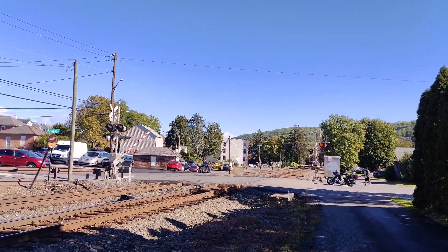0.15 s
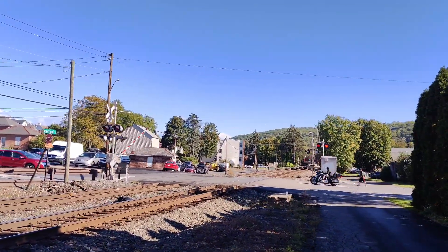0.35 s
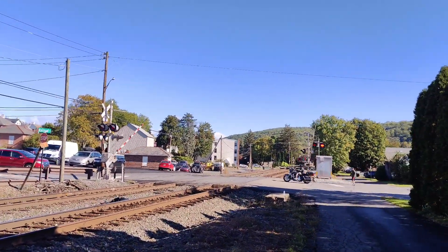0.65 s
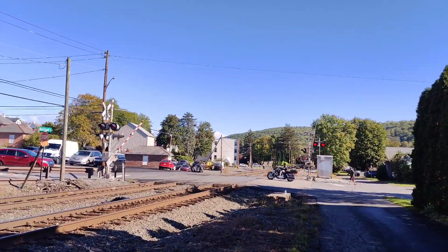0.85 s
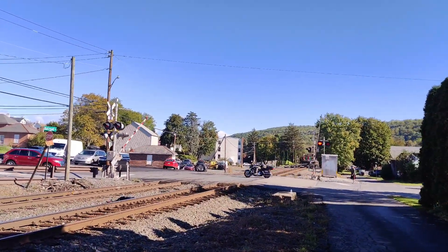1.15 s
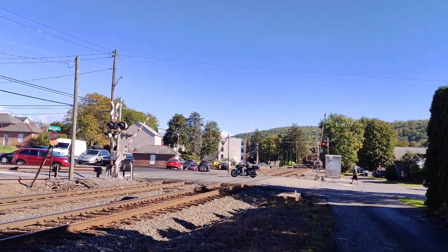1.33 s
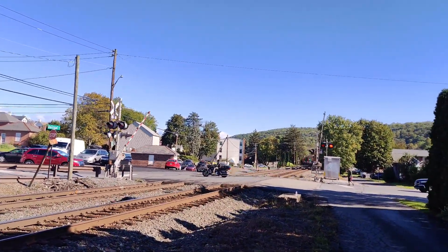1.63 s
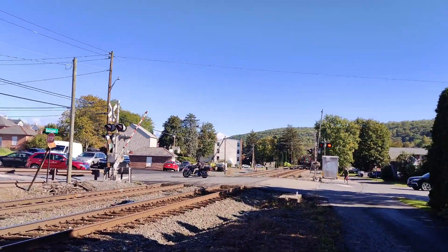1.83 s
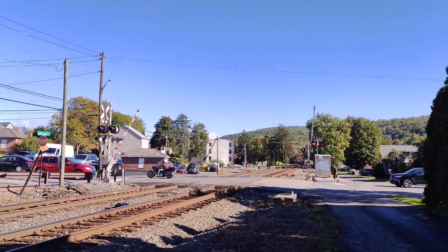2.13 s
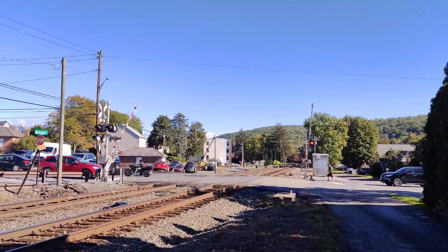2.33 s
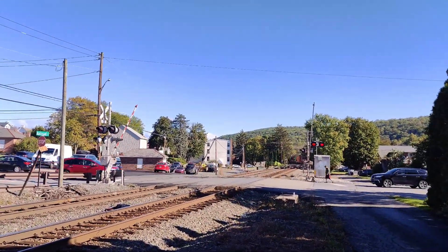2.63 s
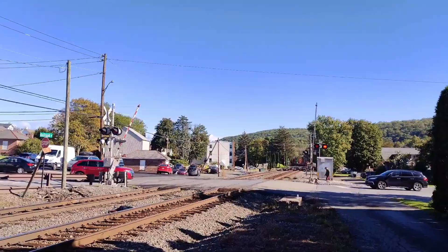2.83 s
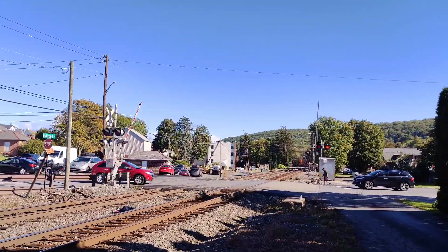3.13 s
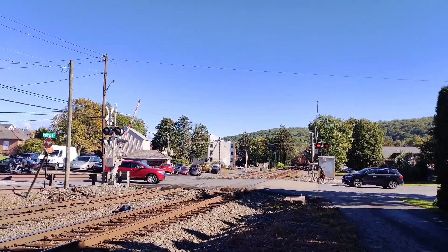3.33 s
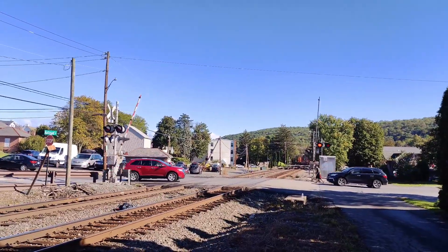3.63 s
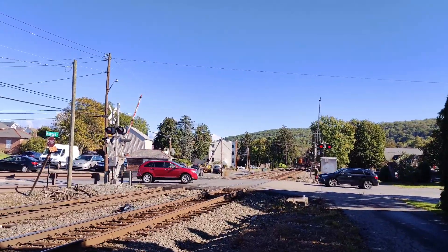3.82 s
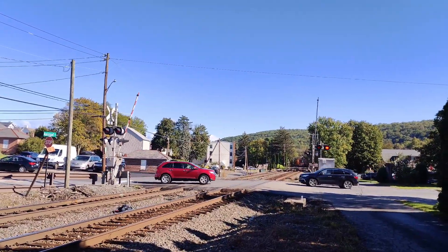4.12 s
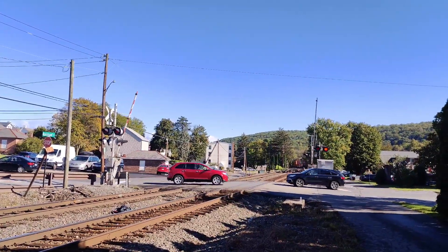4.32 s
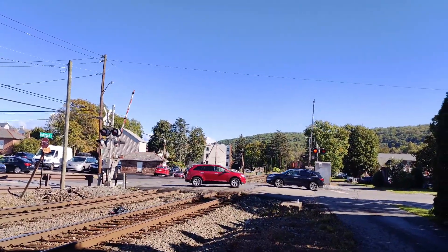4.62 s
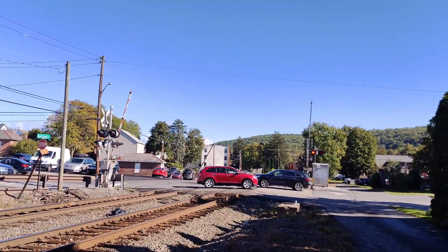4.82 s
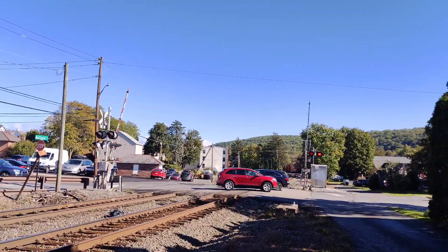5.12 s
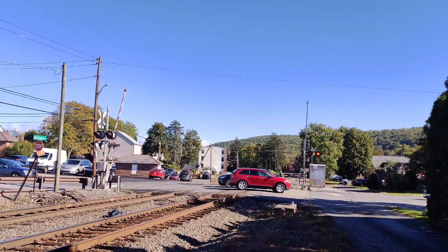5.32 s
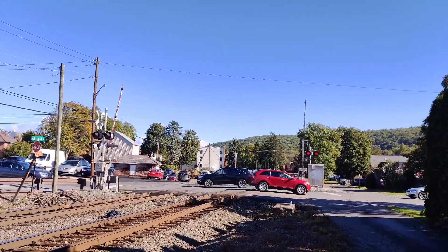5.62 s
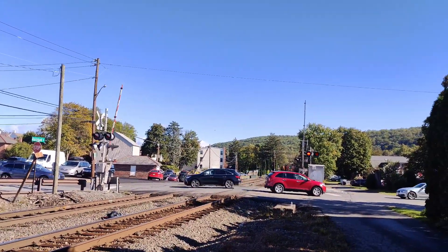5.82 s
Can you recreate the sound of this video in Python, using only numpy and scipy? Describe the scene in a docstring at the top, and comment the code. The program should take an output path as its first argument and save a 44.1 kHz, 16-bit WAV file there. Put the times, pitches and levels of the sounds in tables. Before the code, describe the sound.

Outdoor stereo on a small handheld microphone beside a level crossing. From the start a big V-twin motorcycle is already pulling, with low, uneven exhaust puffs, coarse gas rasp and a slight metallic ring, while wind flutters and thumps hard on the left until about 0.4 s. Engine speed rises until about 1.3 s; around 1.45 s the throttle closes, the rasp collapses and the pitch drops for a gear change. One tiny dry tick comes close by at 1.7 s. From about 2.1 s the exhaust bites again, crackly at first, climbing to a full growl at 3.4-4.0 s, with another left-side gust. The bike drifts from right to left. After 4.1 s it eases, with a brief narrow swish around 4.15-4.5 s, then fades to a dull, distant throb by 6 s. Wind buffets return from 4.7 to 5.4 s. Faint street echoes and a low far-traffic hum lie beneath.

```python
"""V-twin motorcycle riding off

A big V-twin accelerates over a level crossing from right to left, changes gear and rides away.
Its two cylinders fire unevenly: each firing gives low exhaust puffs, a burst of rasp noise and a metallic ring.
A sine throbs with the crank, and a narrow swish of noise joins in later. Far traffic is a steady noise hum.
Wind noise and short buffets hit the two microphone ports, mostly the left; a dry tick rings close by."""
import sys
import numpy as np
from scipy import signal
from scipy.fft import rfft, irfft
from scipy.io import wavfile
from scipy.ndimage import uniform_filter1d, map_coordinates

SR = 44100
rng = np.random.default_rng(int(sys.argv[2]) if len(sys.argv) > 2 else 0)


def pcm_store(signal):
    """Save signal as 16-bit PCM."""
    levels = np.round(np.clip(np.atleast_2d(signal), -1, 1) * 32767)
    wavfile.write(sys.argv[1], SR, levels.astype(np.int16).T)


def boost(x):
    """Linear amplitude factor 10**(x/20) for a level x in decibels (scalar or array-like)."""
    u = np.asarray(x, float) / 20
    return 10 ** u


N = 262836

# engine speed: time_s, speed_rpm
ENGINE_SPEED = [(0.0, 1642), (0.3, 1642), (0.55, 1715), (0.76, 1924), (1.25, 2356), (1.45, 2338),
                (1.7, 1760), (2.2, 1731), (2.53, 1857), (3.33, 2310), (4.27, 2783), (4.5, 2785),
                (4.85, 2745), (5.12, 2640), (5.4, 2625), (5.65, 2500), (5.96, 2456)]
# low tone at one cycle per crank turn: time_s, level_db
THROB_LEVEL = [(0, -33), (1.5, -27), (3.4, -37), (3.8, -14.5), (4.12, -39.5), (4.35, -22.5), (4.6, -37),
               (5.5, -30), (5.96, -32)]
# gas rasp at the pipe ends: time_s, low_db, middle_db, high_db, share gated by the firings (0-1)
RASP_LEVELS = [(0.0, -28, -30, -29, 0.7), (0.45, -27, -25, -31, 0.41), (0.75, -27, -24, -27.5, 0.75),
               (0.94, -28, -25, -29, 0.59), (1.2, -28, -24, -30, 0.52), (1.44, -39, -35, -39, 0.15),
               (1.95, -38.5, -37.5, -39.5, 0.08), (2.07, -38, -33.5, -37, 0.2),
               (2.12, -35, -30.5, -31, 0.74), (2.2, -35.5, -30.5, -33.5, 0.8),
               (2.3, -34.5, -32.5, -37, 0.46), (2.45, -33, -27.5, -27, 0.92), (2.54, -30, -25.5, -30, 0.85),
               (2.64, -31, -25.5, -30, 0.74), (2.84, -31.5, -26, -29.5, 0.93),
               (2.95, -32, -32.5, -36, 0.26), (3.15, -32, -31.5, -37, 0.3),
               (3.36, -26.5, -23.5, -26.5, 0.59), (3.6, -26.5, -24, -29, 0.63),
               (3.75, -23.5, -22, -26, 0.56), (3.97, -21.5, -22.5, -27.5, 0.44),
               (4.1, -29, -30, -33.5, 0.4), (4.33, -30.5, -30.5, -36, 0.1), (4.46, -27.5, -27, -31, 0.36),
               (4.6, -32.5, -32.5, -38.5, 0.1), (5.25, -49.5, -46.5, -52, 0.45),
               (5.96, -47, -61, -75, 0.97)]
# top rasp band, above 7.5 kHz, against the high one: time_s, level_db
SIZZLE_LEVEL = [(0, -9.5), (.75, -8.5), (1.4, -12.5), (2.0, -14), (2.45, -10.5), (3.1, -11.5), (3.6, -11.5),
                (4.0, -10), (4.6, -13), (5.96, -10.5)]
# spectrum of the rasp noise: frequency_hz, level_db (per Hz)
RASP_SPECTRUM = [(210, -33.5), (350, 4), (484, -17.5), (620, 3), (831, 1.5), (1180, 7), (1470, -6),
                 (1770, -5), (2000, -8), (2370, -8), (3180, -4.5), (3700, -13.5), (5990, -18.5),
                 (7000, -20), (8160, -14.5), (10400, -34.5), (14000, -61)]
# shape of a rasp burst, one row per band: swell_s, lead_s (how far ahead of the firing it starts)
RASP_BURST = [(.0013, .0052), (.0014, .0036), (.0012, .0033), (.0012, .0033)]
# spectrum of the far traffic: frequency_hz, level_db (per Hz)
TRAFFIC_SPECTRUM = [(15, -29.5), (25, -11.5), (60, -8.5), (126, -5.5), (372, -32.5), (599, -33.5),
                    (1470, -41.5), (2440, -39.5), (3180, -44.5), (5400, -48), (14000, -102.5)]
# lasting gusts on the ports: start_s, length_s, left_db, right_db
LONG_GUSTS = [(-0.05, 0.46, -10.5, -18), (1.25, 0.36, -22.5, -20), (1.936, 0.3, -32, -19.5),
              (3.473, 0.42, -8, -20), (4.725, 0.66, -15.5, -14.5)]
# short buffets: centre_s, level_db (port hit hardest), length_s, pitch_hz, left_minus_right_db
SHORT_BUFFETS = [(0.021, -9, .03, 202, 2.5), (0.046, -7, 0.056, 155, 28), (0.122, -13, 0.029, 290, 5),
                 (0.165, -6, 0.053, 134, 22.5), (0.204, -6.5, 0.043, 248, 11.5),
                 (0.251, -8.5, 0.015, 350, 15.5), (0.288, -9.5, 0.05, 171, 7.5), (0.315, -13, .03, 247, 24),
                 (0.372, -12.5, 0.023, 367, 15), (1.487, -21.5, 0.039, 220, -1.5),
                 (1.986, -22.5, 0.052, 213, 2), (2.228, -20, 0.038, 186, 12), (3.496, -17.5, 0.051, 231, 4),
                 (3.556, -21, 0.048, 300, 11), (3.59, -22, 0.032, 400, 24), (3.704, -22, 0.01, 270, 4),
                 (3.74, -20.5, 0.019, 295, 22), (3.925, -18, 0.04, 353, 25),
                 (4.777, -10.5, 0.02, 330, 18.5), (4.808, -18.5, 0.036, 204, 20),
                 (4.879, -18.5, .06, 199, 14), (5.064, -24.5, 0.017, 214, 13), (5.125, -36.5, .04, 240, 1),
                 (5.225, -11.5, 0.016, 124, 2), (5.251, -9, 0.024, 121.4, 21),
                 (5.273, -12.5, 0.016, 257, 15.5), (5.301, -15, 0.037, 200, 27),
                 (5.319, -23.5, 0.018, 390, 15), (5.341, -18, 0.018, 269, 31)]
# exhaust puffs: time_s, thump_db, bark_db, snarl_db
PUFF_LEVELS = [(0.0, -22, -18.5, -35), (0.5, -22.5, -25.5, -21.5), (0.749, -19, -21, -21),
               (1.13, -23, -15, -21), (1.45, -17.5, -26, -26.5), (1.74, -32.5, -33, -40),
               (2.138, -13, -16.5, -38.5), (2.36, -22, -19, -29.5), (2.651, -17, -16.5, -24),
               (2.92, -15.5, -20, -24), (3.328, -15.5, -15.5, -28.5), (3.803, -22.5, -13.5, -17.5),
               (4.099, -20.5, -12, -31), (4.449, -35, -16, -29), (4.599, -37.5, -19.5, -39),
               (5.15, -17.5, -27, -34), (5.5, -22.5, -30.5, -42), (5.95, -22, -69.5, -47.5)]
# boom of the puffs, between thump and bark: time_s, level_db
BOOM_LEVEL = [(0, -26.5), (.5, -25.5), (1.0, -19), (1.398, -19.5), (1.701, -35.5), (2.0, -31.5),
              (2.501, -20), (2.9, -21), (3.4, -23), (3.898, -19), (4.3, -18.5), (4.55, -30), (4.8, -26.5),
              (5.299, -26), (5.96, -40)]
# pipe resonances in the order thump, bark, snarl, boom: pitch_hz, swell_s
PIPE_RESONANCES = [(78, 0.0071), (145, 0.0046), (215, 0.0031), (108, 0.0055)]
# ringing modes of the silencer shell: pitch_hz, level_db (against each other), t60_s (time to fall 60 dB)
SHELL_MODES = [(655, -18, 0.024), (1008, -20.5, .025), (1145, -14, 0.048), (1720, -15, 0.075),
               (2282, -12.5, 0.06), (5870, -19, 0.036)]
# extra level of the two lowest shell modes, a growl under load: time_s, extra_db
GROWL_LEVEL = [(0, 7), (1.3, 0), (2.4, -11.5), (3.3, -9), (3.6, 6), (3.85, 9.5), (4.0, 14), (4.1, 8),
               (5.96, 20)]
# dry tick close by: time_s, strike_db
TICK_TIMES = [(1.6709, -19)]
# ringing modes of the tick: pitch_hz, level_db, t60_s
TICK_RINGS = [(5000, 4.5, 0.0016), (6900, -11.5, 0.0081), (13000, -17.5, 0.0098)]
# swish, probably tyres on the crossing: time_s, level_db
SWISH_LEVEL = [(0, -49), (3.9, -54), (4.15, -34), (4.3, -42.5), (4.42, -29.5), (4.56, -51.5), (4.8, -45.5),
               (5.1, -50), (5.3, -59.5), (5.96, -58)]
# echoes from road and house fronts: late_s, level_db
STREET_ECHOES = [(.011, -14), (.019, -17), (.047, -15), (.083, -15)]
# where the bike is: time_s, left_lag_samples (negative: the left port hears it first)
BIKE_BEARING = [(0, 8.0), (1.2, 5.5), (2.2, -1.0), (3.2, -8.0), (4.2, -13.0), (5.2, -18.0), (5.96, -18.0)]
# difference in tone between the ports: frequency_hz, left_minus_right_db
PORT_TONE = [(60, 2.5), (130, -1), (290, 1), (620, -0.5), (1360, -2), (2960, -3), (6460, 3.5), (14100, -11)]


def rms_one(x):
    """Scale each channel to an rms (average strength) of 1."""
    return x / np.sqrt(np.mean(x ** 2, axis=-1, keepdims=True) + 1e-20)


def in_time(rows):
    """Draw straight lines between a table's times: one curve over all samples per column."""
    s, *columns = np.transpose(rows)
    return [np.interp(np.arange(N) / SR, s, column) for column in columns]


def at_hz(points):
    """Read a spectrum table at every FFT bin, along a log frequency scale."""
    hz = np.maximum(np.arange(N // 2 + 1) * SR / N, 1)
    point_hz, point_db = np.array(points)[:, 0], np.array(points)[:, 1]
    return np.interp(np.log(hz), np.log(point_hz), point_db)


def coloured(x, points):
    """Shape the spectrum of a sound by a table."""
    return irfft(rfft(x) * boost(at_hz(points)), N)


def band(x, low_hz, high_hz):
    """Keep mainly what lies between two frequencies."""
    return signal.sosfilt(signal.butter(2, [low_hz, high_hz], "band", fs=SR, output="sos"), x)


def drift(rate_hz, channels):
    """Slow random wandering with spread 1: smoothed noise made at every 40th sample."""
    step = 40
    r = np.exp(-2 * np.pi * rate_hz * step / SR)
    white = rng.standard_normal((channels, N // step + 2002))
    slow = signal.lfilter([1], [1, -2 * r, r * r], white)[:, 2000:]   # skip the filter's start
    return np.array([np.interp(np.arange(N) / step, np.arange(len(s)), s) for s in rms_one(slow)])


def evened(x):
    """Hold the level over half a second steady while the firing rate changes."""
    return x / np.sqrt(uniform_filter1d(x ** 2, size=SR // 2, axis=-1) + 1e-12)


def firings():
    """Find the sample of each firing and whether it is the rear cylinder's; a cycle is two crank turns."""
    start_cycle, rear_fires_at = -.72, .432   # shares of a cycle; uneven, as .5 would be even
    cycle = start_cycle + np.cumsum(in_time(ENGINE_SPEED)[0]) / 120 / SR
    whole = np.arange(0, cycle[-1] - 1)
    marks = np.ravel(np.c_[whole, whole + rear_fires_at])
    return np.searchsorted(cycle, marks), np.arange(len(marks)) % 2


def throb():
    """A clean sine that makes one cycle per turn of the crank."""
    turns = np.cumsum(in_time(ENGINE_SPEED)[0]) / 60 / SR
    return np.sqrt(2) * boost(in_time(THROB_LEVEL)[0]) * np.sin(2 * np.pi * turns)


def rasp(at, rear):
    """Turbulent gas noise that jumps up at each firing and dies in milliseconds, in four bands."""
    spread_db, rear_db = 1.2, -2.5   # firing to firing; rear cylinder against front
    tail_db, tail_s = -9, .008
    *levels, gated = in_time(RASP_LEVELS)
    levels.append(levels[-1] + in_time(SIZZLE_LEVEL)[0])
    share = np.clip(gated, 0, 1)
    edges_hz = [250, 1400, 3200, 7500, 15000]
    noise = coloured(rng.standard_normal((3, N)), RASP_SPECTRUM)
    noise = noise[0] + 0.82 * noise[1:]   # partly shared, partly own in each port
    chance = rng.standard_normal((len(at), 5))   # one column per band, the last for all bands
    t, out = np.arange(SR // 10) / SR, 0
    for k, (swell, lead) in enumerate(RASP_BURST):
        clicks = np.zeros(N)
        strength_db = rear_db * rear + spread_db * (chance[:, 4] + chance[:, k])
        clicks[np.maximum(at - round(lead * SR), 0)] = boost(strength_db)
        jump = (t / swell) ** 2 * np.exp(2 - t / swell) / 4
        tail = boost(tail_db) * (1 - np.exp(-t / swell)) ** 2 * np.exp(-t / tail_s)
        burst = evened(signal.fftconvolve(clicks, jump + tail)[:N])
        gated_share = share ** (1.0, 1.0, 0.91, 1.0)[k]
        gate = np.sqrt(gated_share * burst ** 2 + 1 - gated_share)   # the rest hisses steadily
        out = out + boost(levels[k]) * gate * rms_one(band(noise, edges_hz[k], edges_hz[k + 1]))
    return out


def traffic():
    """Distant engines and tyres as noise, alike in both ports in the bass, unrelated in the treble."""
    noise = coloured(rng.standard_normal((3, N)), TRAFFIC_SPECTRUM)
    high_pass = signal.butter(1, 900, "high", fs=SR, output="sos")
    apart = signal.sosfilt(high_pass, noise[1:] - noise[0])   # swaps shared treble for own treble
    level_db = -22 + 0.75 * drift(2.3, channels=1)
    return boost(level_db) * rms_one(noise[0] + apart)


def gusts():
    """Wind strength at each port in dB: a wavering breeze plus lasting gusts with quick edges."""
    breeze_db, edge_s = -36, 0.019
    t = np.arange(N) / SR
    power = boost(breeze_db + 4.9 * drift(10.0, channels=2)) ** 2
    for start, length, *level_db in LONG_GUSTS:
        blowing = np.clip(np.minimum(t - start, start + length - t) / edge_s, 0, 1)
        waver = boost(0.65 * drift(5.8, channels=2))
        power = power + (boost(np.array(level_db))[:, None] * blowing * waver) ** 2
    return 10 * np.log10(power)


def wind():
    """Lumpy noise, own in each port: low rumble that levels off, and flutter that strong gusts bring out."""
    gust_db = gusts()
    lumps = rms_one(boost(1.3 * drift(26, channels=2)))
    rumble = rms_one(band(rng.standard_normal((2, N)), 39, 112.6))
    flutter = band(band(rng.standard_normal((2, N)), 140, 322), 55, 950)
    flutter = rms_one(flutter * boost(3.1 * drift(45, channels=2)))
    rumble_db = -0.4 * np.maximum(gust_db + 17.5, 0)
    flutter_db = gust_db + 6.5 + [[-3.0], [-10.0]]   # more on the left
    return boost(gust_db) * lumps * (boost(rumble_db) * rumble + boost(flutter_db) * flutter)


def buffets():
    """Each buffet is a bell-shaped burst of noise around its own pitch, unrelated in the two ports."""
    span = SR // 4
    t, out = (np.arange(span) - span // 2) / SR, np.zeros((2, N + span))
    noises = rng.standard_normal((len(SHORT_BUFFETS), 2, span))
    for (s, level_db, length, hz, lean_db), noise in zip(SHORT_BUFFETS, noises):
        bell = np.exp(-4 * (t / length) ** 2)
        burst = bell * band(noise, 0.48 * hz, 1.41 * hz)
        gain = boost(level_db + np.minimum([[lean_db], [-lean_db]], 0))   # weaken only one port
        start = round(max(s, 0) * SR)
        out[:, start:start + span] += gain * rms_one(burst) * np.sqrt(np.mean(bell ** 2))
    return out[:, span // 2:span // 2 + N]


def exhaust(at, rear):
    """Each firing is a short pressure wave that swells and dies in four pipe resonances."""
    spread_db, rear_db = 0.5, -1.5   # firing to firing; rear cylinder against front
    trough = .007   # s after the valve opens
    t, out = np.arange(SR // 8) / SR, 0
    chance = rng.standard_normal((len(at), 5))   # one column per resonance, the last for all
    levels = in_time(PUFF_LEVELS) + in_time(BOOM_LEVEL)
    for k, ((hz, swell), level_db) in enumerate(zip(PIPE_RESONANCES, levels)):
        clicks = np.zeros(N)
        strength_db = rear_db * rear + spread_db * (chance[:, 4] + chance[:, k])
        clicks[np.maximum(at - round(trough * SR), 0)] = boost(strength_db)
        puff = -t ** 2 * np.exp(-t / swell) * np.cos(2 * np.pi * hz * (t - trough))
        out = out + boost(level_db) * evened(signal.fftconvolve(clicks, puff - puff.mean())[:N])
    return out


def shell(at):
    """Each firing makes the silencer shell ring, with chance in strength and pitch, following the rasp."""
    spread_db, detune = 2.5, .05   # blow to blow; detune is a share of the pitch
    _, _, level_db, _, gated = [None, *in_time(RASP_LEVELS)]   # the middle rasp band
    t, out = np.arange(SR // 10) / SR, np.zeros(N + SR)
    where = np.maximum(at - round(.002 * SR), 0)
    hz, mode_db, t60 = np.transpose(SHELL_MODES)[:, :, None]
    is_low_mode = np.arange(len(SHELL_MODES)) < 2
    growl_db = np.outer(in_time(GROWL_LEVEL)[0][where], is_low_mode)
    chance = rng.standard_normal((len(at), 2, len(SHELL_MODES), 1))
    for i, extra_db, (strength, pitch) in zip(where, growl_db, chance):
        ring_db = mode_db + extra_db[:, None] + spread_db * strength - 60 * t / t60
        rings = boost(ring_db) / np.sqrt(t60)
        waves = np.sin(2 * np.pi * hz * (1 + detune * pitch) * t)
        out[i:i + len(t)] += np.sum(rings * waves, axis=0)
    return boost(level_db) * np.clip(gated, 0, 1) * out[:N]


def tick():
    """A hard little contact with a quick, weaker bounce sets three decaying tones ringing."""
    clicks = np.zeros(N) + 1e-18   # a trace above zero keeps the filters fast
    for s, strike_db in TICK_TIMES:
        clicks[round(s * SR)] = boost(strike_db)
        clicks[round((s + .0045) * SR)] = boost(strike_db - 10.0)
    out = 0
    for hz, level_db, t60 in TICK_RINGS:
        r, w = boost(-60 / (t60 * SR)), 2 * np.pi * hz / SR
        out = out + signal.lfilter([0, boost(level_db) * np.sin(w)], [1, -2 * r * np.cos(w), r * r], clicks)
    return out * boost(np.array([[-1.5], [1.5]]))   # left, right


def swish():
    """Narrow noise around 2.4 kHz, made grainy by a slow and a fast random level."""
    low_hz, high_hz = 1940, 2765
    noise = band(band(rng.standard_normal(N), low_hz, high_hz), low_hz, high_hz)
    grain_db = 2.1 * drift(5.4, channels=1)[0] + 3.8 * drift(60, channels=1)[0]
    return boost(in_time(SWISH_LEVEL)[0] + grain_db) * rms_one(noise)


def street(x):
    """Add a few dull echoes with the sides swapped, alternately stronger left and right."""
    out, dull = x.copy(), band(x, 232, 4900)
    for k, (late, level_db) in enumerate(STREET_ECHOES):
        lag = round(late * SR)
        lean_db = 4.7 * np.array([[1], [-1]]) * (-1) ** k
        out[:, lag:] += boost(level_db + lean_db) * dull[::-1, :-lag]
    return out


def ports(x):
    """The sound reaches one port before the other, and the body shades each in its own way."""
    n, lag = np.arange(N), in_time(BIKE_BEARING)[0]
    left = map_coordinates(x[0], [n - lag / 2], order=3, mode="nearest")
    right = map_coordinates(x[1], [n + lag / 2], order=3, mode="nearest")
    shading_db = at_hz(PORT_TONE) * [[.5], [-.5]]
    return irfft(rfft(np.array([left, right])) * boost(shading_db), N)


def scene():
    """Send the bike through street and ports, then add what reaches the ports directly."""
    at, rear = firings()
    bike = throb() + rasp(at, rear) + exhaust(at, rear) + shell(at) + swish()
    return ports(street(bike)) + traffic() + wind() + buffets() + tick()


def roll_off(x):
    """The treble ends steeply here."""
    return signal.sosfilt(signal.butter(12, 14690, fs=SR, output="sos"), x)


def record(dry):
    """Round off the loudest peaks so that they stay within full scale."""
    knee = 0.46   # share of full scale above which rounding begins
    over = np.maximum(np.abs(dry) - knee, 0)
    rounded = (1 - knee) * np.tanh(over / (1 - knee))
    soft = dry - np.sign(dry) * (over - rounded)
    return roll_off(soft)


dry = scene()
out = record(dry)
pcm_store(out)
```